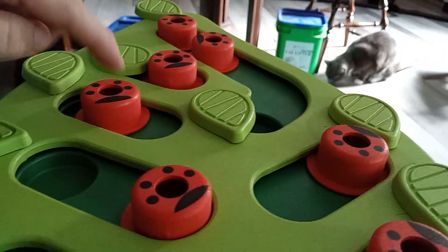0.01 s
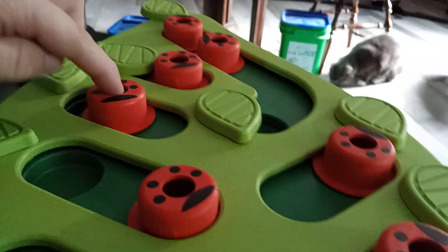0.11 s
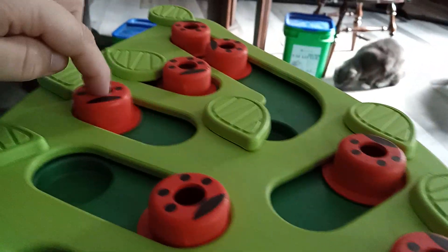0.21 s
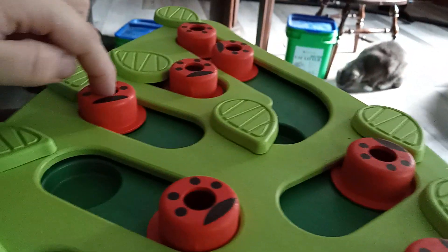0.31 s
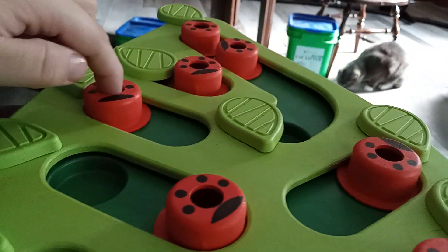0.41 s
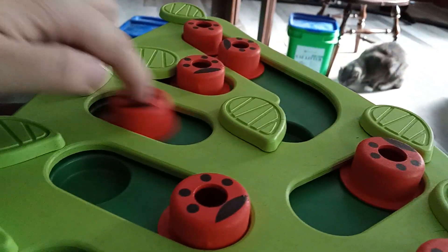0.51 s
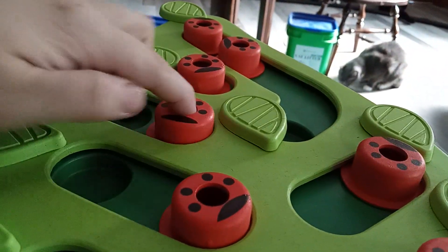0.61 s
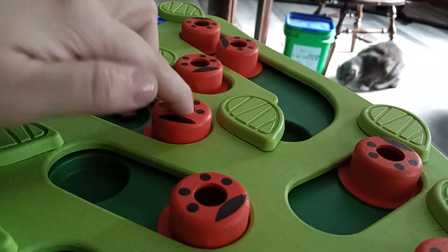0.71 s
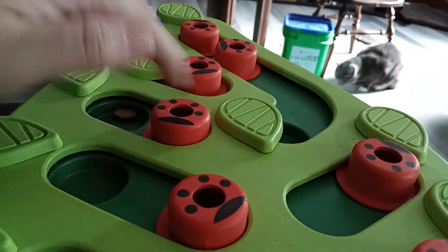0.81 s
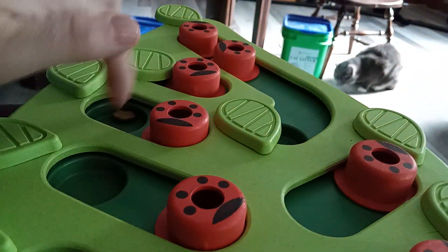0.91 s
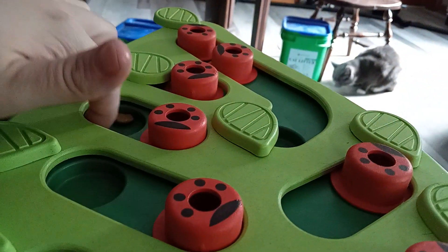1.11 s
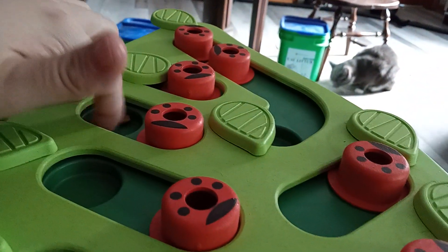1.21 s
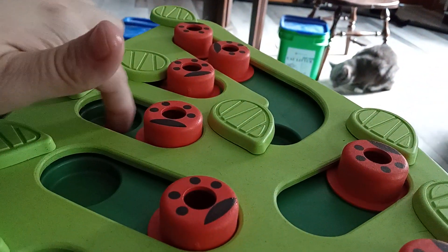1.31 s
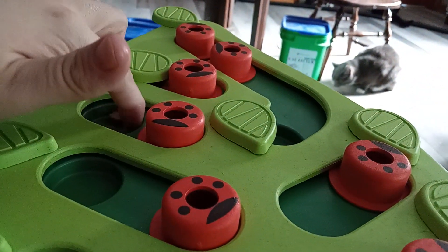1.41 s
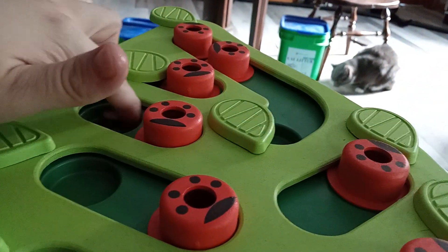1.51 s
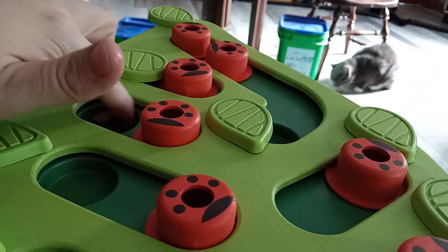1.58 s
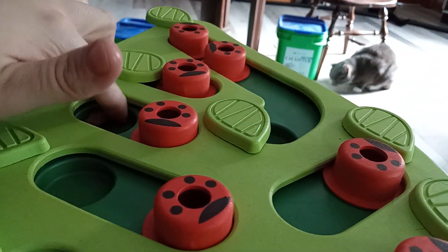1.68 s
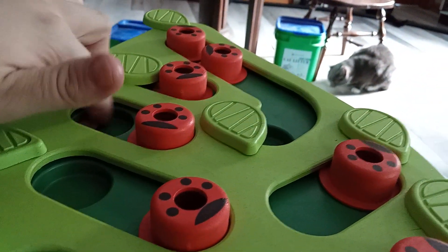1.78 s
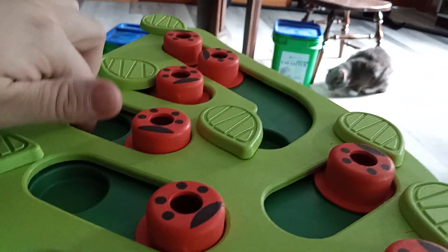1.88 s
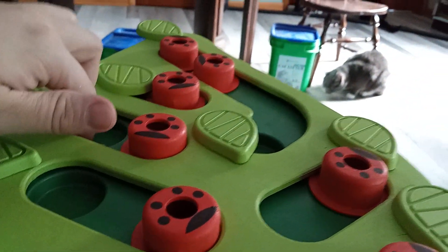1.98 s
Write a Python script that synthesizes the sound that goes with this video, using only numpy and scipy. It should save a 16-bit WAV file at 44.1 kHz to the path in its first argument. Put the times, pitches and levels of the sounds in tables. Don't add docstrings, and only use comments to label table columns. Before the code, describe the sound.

A hard plastic cup is slid in two quick rasping strokes along a hollow plastic board, clicking and knocking, then settles and is nudged; faint finger rubs follow. Small room, low hum, close stereo, board to the left.

```python
import sys
import numpy as np
from scipy import signal
from scipy.fft import rfft, irfft, next_fast_len
from scipy.io import wavfile
from scipy.ndimage import uniform_filter1d, map_coordinates

SR = 44100
rng = np.random.default_rng(int(sys.argv[2]) if len(sys.argv) > 2 else 0)


def output_pcm(signal):
    pcm = np.clip(np.atleast_2d(signal).T, -1, 1) * 32767
    wavfile.write(sys.argv[1], SR, np.round(pcm).astype(np.int16))


def volts(x):
    e = np.asarray(x, float) / 20
    return 10 ** e


N = 88200
TIME = np.arange(N) / SR
TICKS_PER_S = 2500
BRIGHTENS, DULL_HZ = 0.52, 2740
SIDE = np.array([[.5], [-.5]])


def unit(x):
    return x / np.sqrt(np.mean(x ** 2) + 1e-20)


def even(x, size=700):
    return x / np.sqrt(np.abs(uniform_filter1d(x ** 2, size)) + 1e-9)


def along(points, hz):
    f, v = np.transpose(points)
    return np.interp(np.log(hz + 1), np.log(f + 1), v)


def strokes(tables, column=1):
    out = np.full(N, -140.)
    for rows in tables:
        r = np.array(rows)
        inside = (TIME >= r[0, 0]) & (TIME <= r[-1, 0])
        out[inside] = np.interp(TIME[inside], r[:, 0], r[:, column])
    return out


def wobble(rate):
    knots = rng.standard_normal(int(N * rate / SR) + 4)
    return map_coordinates(knots, [np.arange(N) * rate / SR])


def filtered(x, response):
    m = next_fast_len(N + SR // 2)
    return irfft(rfft(x, m) * response(np.fft.rfftfreq(m, 1 / SR)), m)[..., :N]


def low_cut(f):
    return (1j * f / (140 + 1j * f)) ** 3


def treble(x):
    return filtered(x, lambda f: f ** 4 / (DULL_HZ ** 4 + f ** 4))


def causal(points):
    level_db = np.maximum(along(points, np.fft.rfftfreq(4096, 1 / SR)), -90)
    c = irfft(np.log(volts(level_db)))
    c[1:2048] *= 2
    c[2049:] = 0
    h = irfft(np.exp(rfft(c)))[:2048]
    return h / np.linalg.norm(h)


def ticks(rate, spread_db, smooth):
    u = rng.random((3, N))
    sizes = volts(-spread_db * np.log(u[2] + 0.00033))
    spikes = (u[0] < rate / SR) * np.sign(u[1] - .5) * sizes
    return unit(unit(spikes) + smooth * rng.standard_normal(N))


# (time [s], level [dB], ringing centre [Hz])
SLIDES = [
    [(.235, -43.5, 1460), (.24, -37, 1440), (.258, -37.5, 1680), (.28, -35, 1720), (.312, -30.5, 1300),
     (.335, -31, 1750), (.372, -57.5, 1020)],
    [(.539, -54.5, 960), (.547, -44.5, 880), (.563, -44, 1240), (.628, -34.5, 1420), (.645, -30, 1570),
     (.705, -31, 1140), (.718, -38.5, 1140), (.745, -61, 1300), (.788, -62.5, 1300)],
    [(1.104, -43.5, 1415), (1.16, -57.5, 1300), (1.2, -76.5, 1050)],
]
# (frequency [Hz], level per Hz [dB])
BOARD_COLOUR = [(71, -59), (120, -34), (361, -22), (744, -5.5), (1430, -2), (2730, -16.5), (3700, -11.5),
                (4300, -25), (6500, -24.5), (9000, -56.5), (19800, -120)]


def slide():
    bumps = ticks(TICKS_PER_S, spread_db=2.0, smooth=0.36)
    rasp = unit(signal.fftconvolve(bumps, causal(BOARD_COLOUR))[:N])

    count = 1400 * N // SR
    u, z = rng.random((count, 2)), rng.standard_normal(count)
    at = (u[:, 0] * N).astype(int)
    centre = strokes(SLIDES, column=2)
    hz = np.where(centre > 0, centre, 1300)[at] * np.exp(0.38 * z)
    hz = hz[:, None]
    t = np.arange(256) / SR
    ring = volts(-3.5 * np.log(u[:, 1:] + 0.06) - 2.9 * t * hz) * np.sin(2 * np.pi * hz * t)
    places = at[:, None] + np.arange(256)
    grains = np.bincount(places.ravel(), ring.ravel())[:N]

    scrape = even(rasp + volts(-5) * unit(grains))
    speed_db = strokes(SLIDES)
    dulled = 1 - volts(BRIGHTENS * np.minimum(speed_db + 33.0, 0))
    return volts(speed_db + 1.5 * wobble(110)) * (scrape - dulled * treble(scrape))


# (time [s], peak level [dB], ringing [Hz], time to fall 60 dB [s])
KNOCKS = [(0.2311, -28, 820, 0.0038), (0.2372, -17.5, 2295, 0.0038), (0.3278, -15.5, 2400, 0.0048),
          (0.332, -9.5, 2320, 0.0072), (0.3352, -18.5, 2620, 0.011), (0.3447, -18, 1760, 0.0079),
          (0.5465, -40, 940, 0.028), (0.5656, -25.5, 1346, 0.026), (0.6301, -20, 2024, 0.01),
          (0.6475, -23.5, 1020, 0.015), (0.7081, -20.5, 2287, 0.0075), (0.7235, -18, 565, 0.021),
          (0.7266, -22.5, 1090, 0.012), (0.7912, -35.5, 920, 0.022), (0.8132, -31, 1710, 0.014),
          (0.8745, -17, 1237, 0.016), (0.8784, -13, 1330, 0.015), (0.8799, -26.5, 1950, 0.0084),
          (0.8962, -22.5, 1285, 0.017), (0.9082, -27.5, 1440, 0.017), (0.918, -28, 1206, 0.0076),
          (1.0979, -26, 1030, 0.0087), (1.1016, -20.5, 1450, 0.016), (1.109, -42, 2500, 0.014), ]
# (frequency [Hz], level per Hz [dB])
CRACK_COLOUR = [(60, -69.5), (130, -15), (400, -8.5), (1260, -5), (2430, -4.5), (4320, -15.5),
                (5400, -14.5), (9000, -42.5), (16000, -66)]
# (ringing [Hz], level [dB], time to fall 60 dB [s])
HOLLOW = [(265, -4, .04), (335, -3, .05), (425, 0, .03)]
# (time [s], thump level [dB], snap level [dB])
THUMPS = [
    (0.2351, -37.5, -45),
    (0.331, -37, -40),
    (0.3474, -33, -47.5),
    (.566, -52, -62.5),
    (0.721, -37, -41),
    (0.8738, -37, -42),
    (1.097, -26.5, -26.5),
]


def knocks():
    broad, rings = np.zeros(N + SR), np.zeros(N + SR)
    t = np.arange(2048) / SR
    for s, db, hz, t60 in KNOCKS:
        i = round(s * SR)
        fade = volts(db - 60 * t / max(t60, .003)) * (1 - np.exp(-t / .0002))
        broad[i:i + len(t)] += volts(-5.5) * fade * rng.standard_normal(len(t))
        broad[i] += volts(db + 4)
        drift = 0.17 * np.cumsum(rng.normal(0, 0.013, len(t)))
        rings[i:i + len(t)] += volts(-5.0) * fade * np.sin(2 * np.pi * hz * t + drift)
    for s, db, snap_db in THUMPS:
        i = round(s * SR)
        body = np.zeros(len(t))
        for hz, gain_db, t60 in HOLLOW:
            body += volts(db + gain_db + rng.normal(0, 1) - 60 * t / t60) * np.sin(2 * np.pi * hz * t)
        rings[i:i + len(t)] += body * (1 - np.exp(-t / 0.002))
        snap = uniform_filter1d(rng.standard_normal(len(t)), size=3)
        rings[i:i + len(t)] += volts(snap_db - 60 * t / 0.0028) * snap
    cracks = signal.fftconvolve(broad, causal(CRACK_COLOUR))[:N]
    force_db = np.interp(TIME, *np.transpose(KNOCKS)[:2])
    dulled = 1 - volts(BRIGHTENS * np.minimum(force_db + 17, 0))
    return cracks - dulled * treble(cracks) + rings[:N]


def soft_contacts(contacts):
    out, t = np.zeros(N + SR), np.arange(4096) / SR
    rise = 1 - np.exp(-t / 0.00034)
    for s, db, hz, t60 in contacts:
        fade = volts(db - 60 * t / max(t60, .003))
        out[round(s * SR):][:len(t)] += fade * rise * np.sin(2 * np.pi * hz * t)
    return out[:N]


# (time [s], peak level [dB], ringing [Hz], time to fall 60 dB [s])
CATCHES = [(.2435, -46, 1300, .015), (.2535, -27, 1600, .012), (.2675, -24, 1800, .014),
           (.2735, -18.5, 1780, .014), (.2845, -19.5, 1460, 0.0062), (.292, -22, 1000, .015),
           (.2955, -20, 1700, .012), (.3045, -21, 1390, .012), (.311, -19.5, 1300, .014),
           (.3155, -12, 1520, 0.013), (.3348, -19, 2200, .01), (.3442, -21, 1760, .014),
           (.349, -37, 900, .015), (.5443, -31, 850, .03), (.5505, -31, 900, .02),
           (.5652, -20.5, 750, 0.0068), (.5675, -24.5, 1450, .015), (.5875, -29.5, 1700, .012),
           (.5915, -33.5, 850, .03), (.605, -29, 1700, .025), (.6045, -31, 800, .02),
           (.6165, -25, 800, .015), (.6297, -12.5, 1940, 0.01), (.6485, -25, 1010, .015),
           (.653, -19.5, 2100, 0.022), (.6385, -23, 2010, 0.022), (.6615, -22, 950, .014),
           (.6675, -17, 1500, .014), (.672, -18, 1300, .018), (.6935, -22.5, 900, .015),
           (.704, -15, 1300, .015), (.7078, -13, 2260, 0.008), (.7232, -25, 1200, .015),
           (.7262, -26.5, 1500, .012), (.741, -43, 1300, .04), (.8128, -35.5, 2400, .015),
           (1.106, -30, 1300, .012), (1.11, -33.5, 1100, .015), (1.1615, -44, 1400, .015)]


def catches():
    return soft_contacts(CATCHES)


# (time [s], low ring [dB], high ring [dB], lean to the left [dB])
PAD = [
    (1.2, -13, -21, 0.5),
    (1.25, -22, -24, 13),
    (1.34, -22.5, -1.5, 6),
    (1.599, -15.5, -17, -0.5),
    (1.789, -3.5, -17, 3.5),
    (1.85, -14, -15, 6.5),
    (1.93, -2.5, -6, 10.5),
]


def pad(column):
    return np.interp(TIME, *np.transpose(PAD)[[0, column]])


# (time [s], level [dB])
RUBS = [
    [(1.19, -97), (1.24, -81.5), (1.31, -84), (1.322, -67), (1.334, -56), (1.346, -59), (1.356, -68),
     (1.385, -97.5), (1.49, -85), (1.53, -91)],
    [(1.58, -77.5), (1.592, -62.5), (1.625, -63.5), (1.645, -77), (1.67, -72), (1.687, -62.5), (1.712, -62),
     (1.75, -87.5)],
    [(1.784, -85), (1.792, -66), (1.866, -62), (1.88, -63), (1.9, -57.5), (1.94, -61), (2.0, -64)],
]
# (centre [Hz], width [Hz], level [dB])
WELL = [(1300, 210, -5), (1744, 320, 15), (2656, 1300, -4), (3420, 490, -14)]


def rub():
    def ring(f, centre, width):
        return 1j * f * width / (centre * centre - f * f + 1j * f * width)

    def well_response(f):
        return sum(volts(db) * ring(f, c, w) for c, w, db in WELL) / (1 + 1j * f / 4500) ** 2

    grit = ticks(TICKS_PER_S, spread_db=2.4, smooth=1)
    well = even(filtered(grit, well_response))
    low = even(filtered(grit, lambda f: ring(f, 1006, 422) ** 2))
    high = even(filtered(grit, lambda f: ring(f, 5550, 710) ** 2))
    top = even(filtered(grit, lambda f: ring(f, 9500, 810) ** 2))
    voice = well + volts(pad(1)) * low + volts(pad(2)) * (high + volts(-11.5) * top)
    return volts(strokes(RUBS) + 1.85 * wobble(77)) * voice


# (time [s], peak level [dB], ringing [Hz], time to fall 60 dB [s])
DABS = [(1.3085, -59.5, 14900, .012), (1.3439, -46, 5180, 0.014), (1.342, -57, 1720, 0.012),
        (1.4856, -68.5, 1800, 0.046), (1.5876, -54, 1910, 0.04), (1.683, -52, 1820, 0.043),
        (1.69, -50.5, 2080, 0.021), (1.706, -51.5, 1790, .025), (1.7905, -57, 704, 0.068),
        (1.7921, -64.5, 442, 0.14), (1.888, -54, 1930, 0.035), (1.925, -58, 965, 0.029),
        (1.945, -62.5, 392, 0.054), (1.96, -55.5, 946, 0.099)]


def dabs():
    return soft_contacts(DABS)


# (time [s], level [dB])
SLIPS = [
    [(.2, -92), (.208, -57), (.232, -63), (.255, -83), (.32, -52), (.365, -90)],
    [(.58, -69), (.6, -61), (.67, -48.5), (.71, -52.5), (.75, -107)],
    [(.82, -90), (.842, -69), (.866, -59), (.92, -103)],
    [(1.1, -99), (1.14, -67), (1.17, -82.5)],
    [(1.305, -99), (1.309, -68), (1.32, -67), (1.342, -60.5), (1.375, -93.5)],
    [(1.58, -84), (1.71, -77), (1.76, -100), (1.89, -66.5), (2.0, -68)],
]
# (frequency [Hz], level per Hz [dB])
SKIN_COLOUR = [(8500, -14.5), (11500, -12), (13500, -14.5), (14800, -1), (15600, 1.5)]


def slip():
    grit = ticks(TICKS_PER_S, spread_db=2.5, smooth=1.5)
    hiss = filtered(grit, lambda f: volts(along(SKIN_COLOUR, f)) * (f > 4000))
    return volts(strokes(SLIPS) + 1.4 * wobble(75)) * even(hiss)


def echoes(x, t60, count, size):
    out, step = np.zeros((2, N + SR)), SR // count
    for i in range(0, N, step):
        hz, t, z = signal.stft(rng.standard_normal((2, size)), SR, nperseg=64)
        tail = signal.istft(z * volts(-60 * t / t60(hz)[:, None]), SR, nperseg=64)[1]
        wet = signal.fftconvolve(x[None, i:i + step], tail / np.linalg.norm(tail[0]), axes=1)
        out[:, i:i + wet.shape[1]] += wet
    return out[:, :N]


def table(board):
    wet = echoes(board, lambda f: 0.015 + 0 * f, count=100, size=2048)
    return volts(-5) * filtered(wet, lambda f: (1j * f / (600 + 1j * f)) ** 2)


# (frequency [Hz], level difference [dB])
PAN = [(300, 3.5), (700, 6.5), (1500, 7.5), (4000, 6), (8000, 9), (15000, 14)]
# (frequency [Hz], phase [radians])
LEAD = [(400, .4), (1500, 1.2), (4000, 1.5)]


def at_the_ports(near):
    near = filtered(near, lambda f: volts(SIDE * along(PAN, f)) * np.exp(1j * SIDE * along(LEAD, f)))
    return near * volts(SIDE * pad(3))


# (frequency [Hz], time to fall 60 dB [s])
ROOM = [(400, 0.29), (3000, 0.33), (7000, 0.44), (10000, 0.056)]
# (frequency [Hz], level [dB])
ROOM_COLOUR = [(1000, -0.1), (6000, -2), (9000, -13)]


def room(board):
    coloured = filtered(board, lambda f: volts(along(ROOM_COLOUR, f)))
    late = np.pad(coloured, (400, 0))[:N]
    tail = echoes(late, lambda f: along(ROOM, f), count=8, size=22050)
    return volts(-16.5) * filtered(tail, low_cut)


# (frequency [Hz], level per Hz [dB])
AIR_COLOUR = [(55, 0.5), (110, -4.5), (300, -9), (1000, -23), (6000, -28.5), (8000, -36.5), (13500, -44.5),
              (15200, -31.5)]
# (frequency [Hz], likeness [0 to 1])
AIR_ALIKE = [(40, 0.68), (300, 0.71), (10000, 0.04)]


def background():
    def turn(f):
        return np.arccos(np.clip(along(AIR_ALIKE, f), -1, 1)) / 2

    noise = rng.standard_normal((2, N))
    mid, side = filtered(noise, lambda f: volts(along(AIR_COLOUR, f)) * [np.cos(turn(f)), np.sin(turn(f))])
    air = volts(-73 + 0.56 * wobble(22)) * unit(np.array([mid + side, mid - side]))

    hum_hz, hum_db, hum_pan_db = 87.1, -61.5, -3
    phase = 2 * np.pi * hum_hz * TIME + .2 * wobble(9)
    sway_db = 1.5 * wobble(14) + .9 * np.array([wobble(9), wobble(9)])
    return air + volts(hum_db + sway_db + SIDE * hum_pan_db) * np.sin(phase)


def scene():
    touches = slide() + knocks() + catches() + rub() + dabs() + slip()
    board = filtered(touches, low_cut)
    near = at_the_ports(board + table(board))
    return near + room(board) + background()


def band_limit(x):
    return signal.sosfilt(signal.butter(12, 16760, fs=SR, output="sos"), x)


def record(dry):
    def band(f):
        return volts(np.interp(f, [20, 55, 15500, 15900, 16500], [-16, 0, 0, -18, -45]))

    mix = filtered(dry, band)
    return band_limit(mix)


dry = scene()
out = record(dry)
output_pcm(out)
```